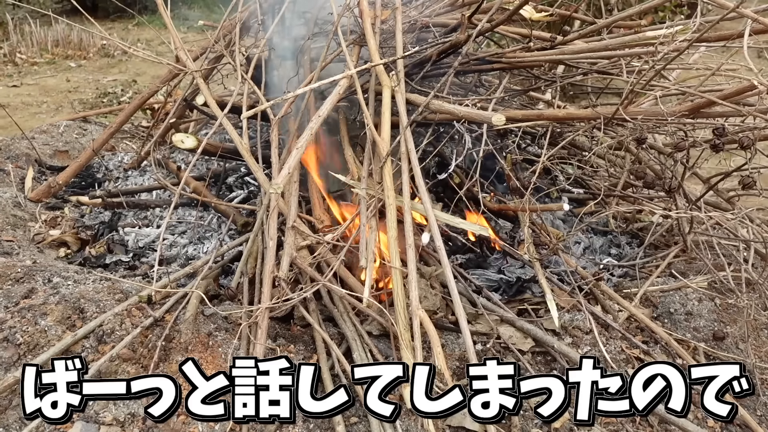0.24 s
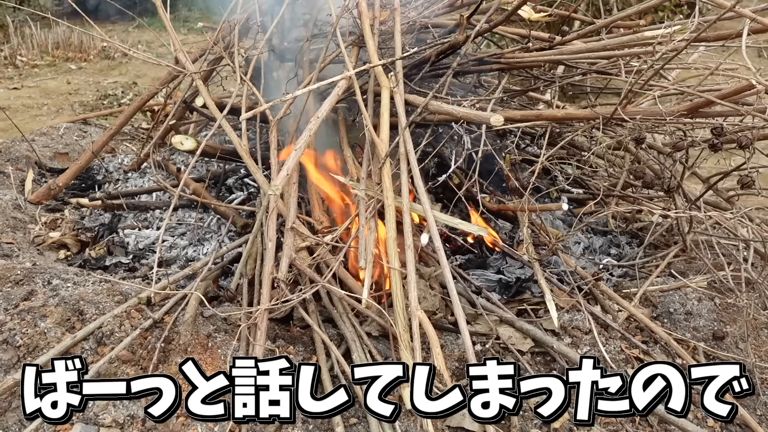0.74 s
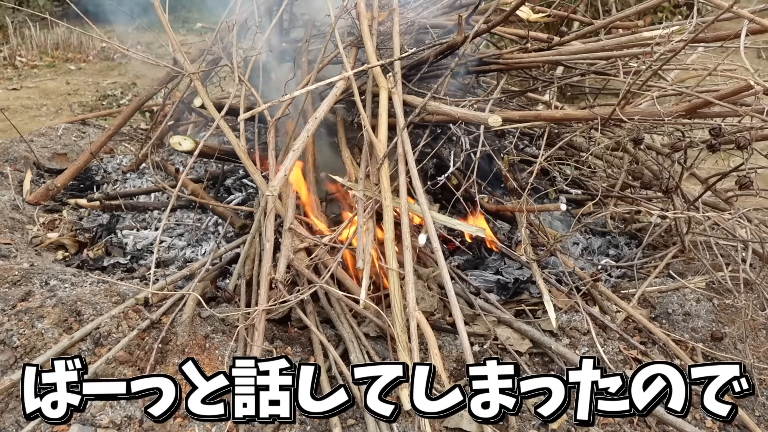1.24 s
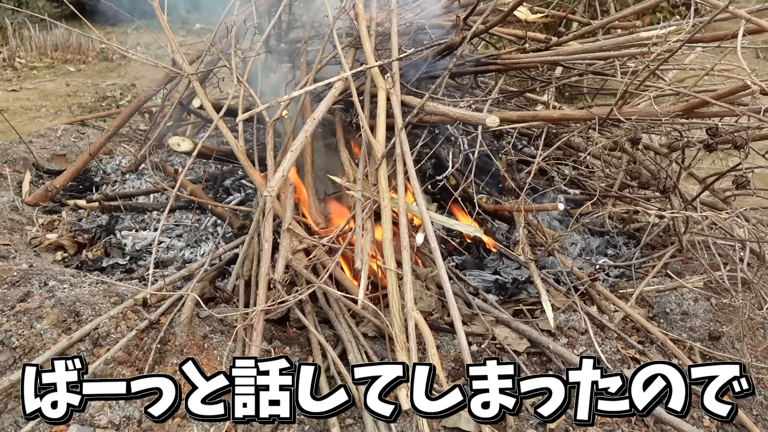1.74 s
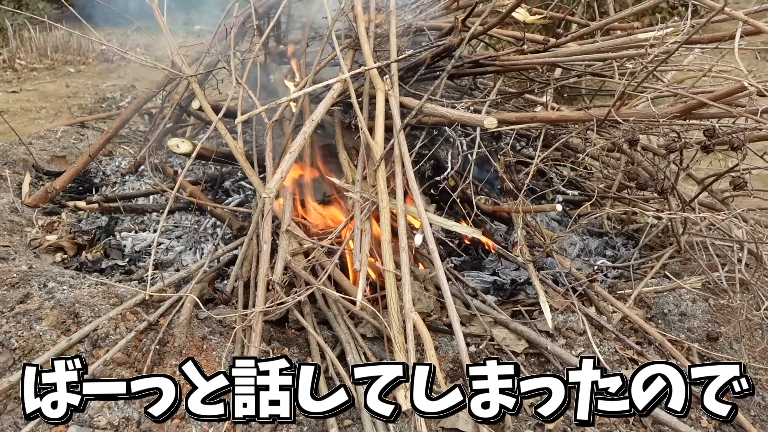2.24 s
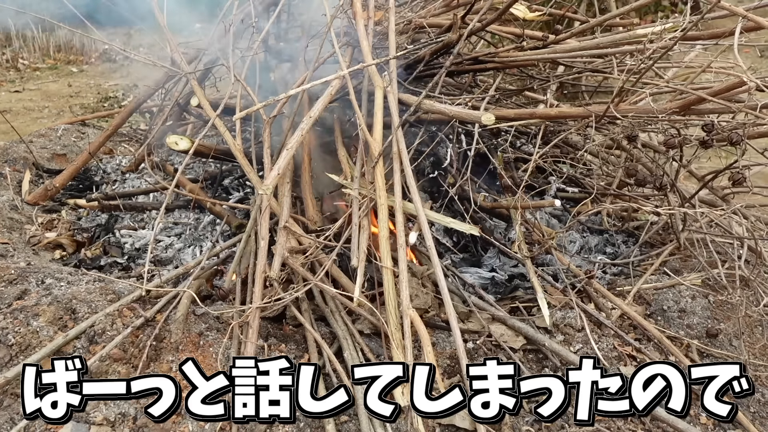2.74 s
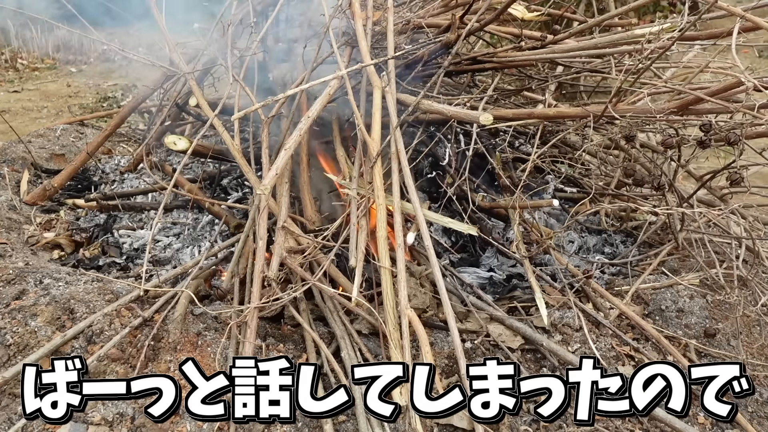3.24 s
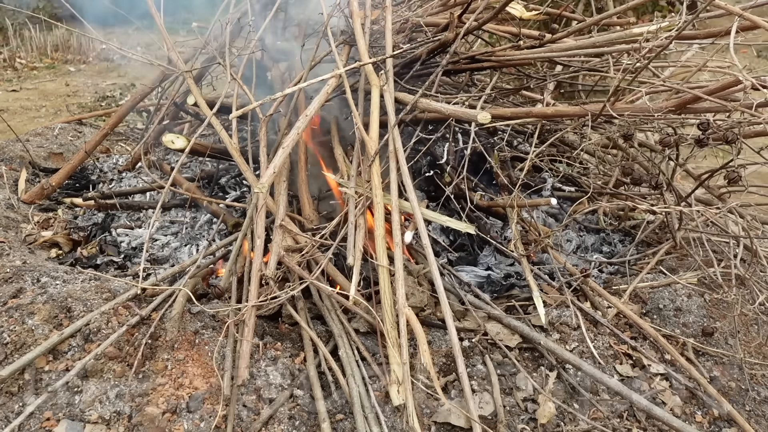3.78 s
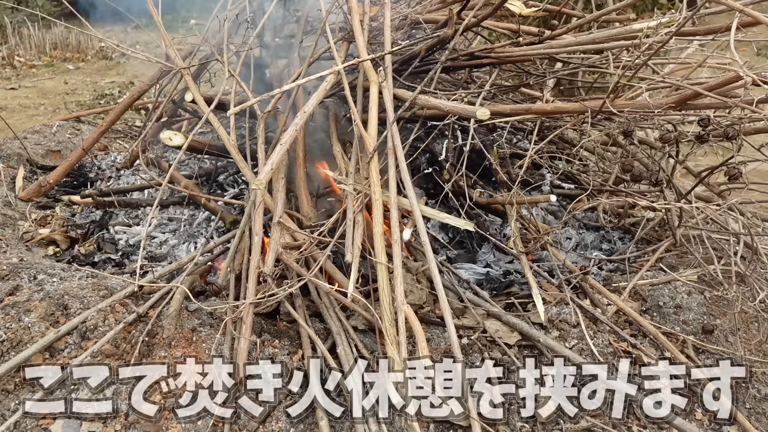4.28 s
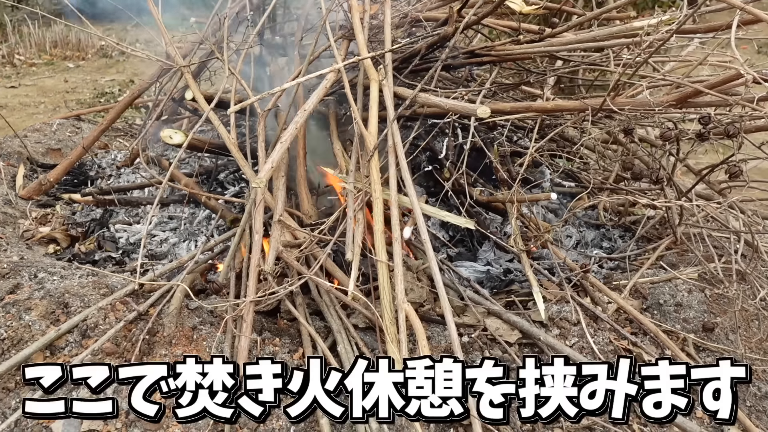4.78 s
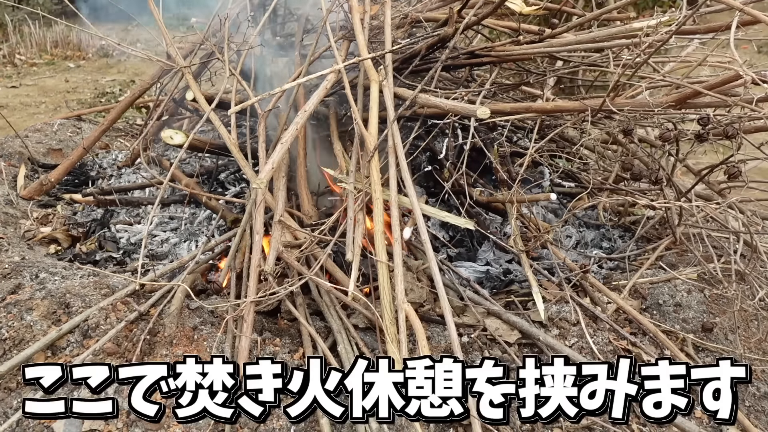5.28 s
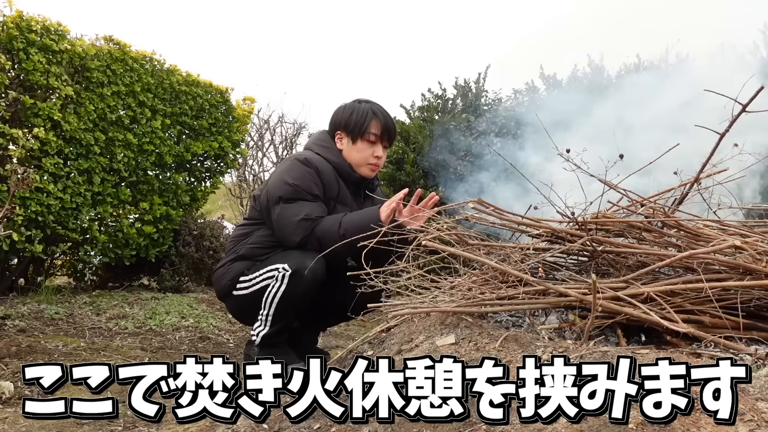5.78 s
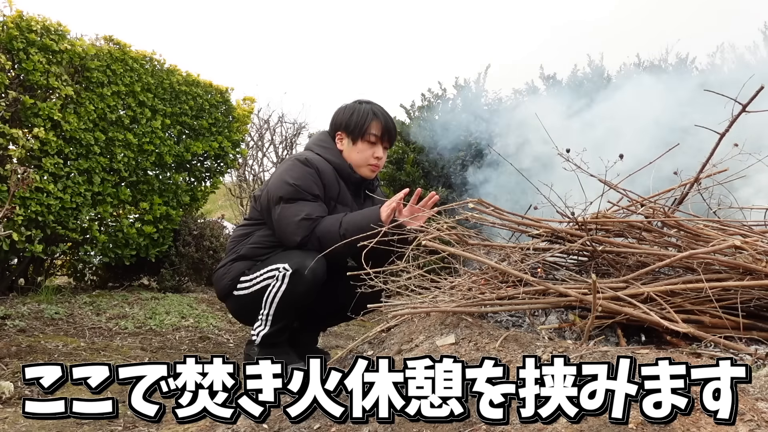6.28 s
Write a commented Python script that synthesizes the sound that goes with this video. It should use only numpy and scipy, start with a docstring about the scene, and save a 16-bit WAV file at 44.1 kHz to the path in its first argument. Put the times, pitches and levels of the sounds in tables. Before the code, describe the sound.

A bonfire of dry branches burns outdoors, heard in stereo from close by. From the start, steam hisses steadily from the wood, slightly right of centre, with fine crackle on top. The flames rumble and flutter softly underneath, fullest in the first second and then easing. Sharp, dry snaps come irregularly among fainter ticks: a strong pair at about 0.2 seconds, more around 1.4 and 1.6, a loud crack with a brief echo at 2.5, and another at 2.8. Three quick snaps fall between 3.4 and 3.6 seconds, along with a tiny rising steam whistle. Weaker ones follow near 4, 4.4 and 5.2 seconds. At about 5.7 seconds the sound abruptly moves a few metres back. The hiss becomes very faint over a low rumble and a light wash of open air, with softer, slightly echoing snaps near 6.1 and 6.5 seconds.

```python
"""Outdoors at a bonfire of dry branches, a stereo pair close by, then abruptly a few metres back.
Under a faint wash of open air the turbulent flames rumble softly, and steam hisses out of the heated
wood, which snaps faintly as it burns. In front, pockets of sap burst in sharp snaps that scatter among
the sticks and come back faintly from the brush pile behind."""
import sys
import numpy as np
from scipy import signal
from scipy.fft import rfft, irfft
from scipy.io import wavfile
from scipy.ndimage import uniform_filter1d

SR = 44100
rng = np.random.default_rng(int(sys.argv[2]) if len(sys.argv) > 2 else 0)


def master(y):
    """Save y as 16-bit WAV."""
    cut = np.clip(np.atleast_2d(y).T, -1, 1)
    pcm = np.round(cut * 32767)  # scale
    wavfile.write(sys.argv[1], SR, pcm.astype(np.int16))


N = 287399
TIME = np.arange(N) / SR
STEP_BACK_S = 5.736  # from here on the microphones stand a few metres back
PULSE_CENTRE_S = .001  # a pressure pulse is centred this far into its sound


def undb(db):
    """Decibels to gain."""
    return 10 ** (np.asarray(db) / 20)


def unit(x):
    """Scale to rms 1."""
    return x / np.sqrt(np.mean(x ** 2))


def curves(table):
    """The columns of a table, joined by straight lines in time."""
    seconds, *columns = np.transpose(table)
    return [np.interp(TIME, seconds, column) for column in columns]


def colour(x, points):
    """Causal filter with a (Hz, dB) spectrum, so that attacks stay sharp."""
    size = 8192
    hz, db = np.transpose(points)
    bins_hz = np.fft.rfftfreq(size, 1 / SR)
    gain = undb(np.interp(np.log(bins_hz + 1), np.log(hz), db))
    cepstrum = irfft(np.log(gain))
    cepstrum[1:size // 2] *= 2  # fold to minimum phase
    cepstrum[size // 2 + 1:] = 0
    response = irfft(np.exp(rfft(cepstrum)))[:size // 2]
    return signal.oaconvolve(np.atleast_2d(x), response[None], axes=1)[:, :N]


def pan(db):
    """Left and right gains for a level difference, left minus right."""
    return undb(np.array([[.5], [-.5]]) * db)


def walk(rate):
    """Random levels held 1 / rate s and smoothed twice; rms 1."""
    hold = int(SR / rate)
    steps = np.repeat(rng.standard_normal(N // hold + 1), hold)
    return unit(uniform_filter1d(uniform_filter1d(steps, hold), hold)[:N])


def wide_noise(spectrum, width):
    """Coloured stereo noise whose width depends on frequency."""
    mid, side = rng.standard_normal((2, N))
    return unit(colour(mid + colour(side, width) * np.array([[1], [-1]]), spectrum))


def band(x, hz, width_hz):
    """One resonance."""
    return signal.lfilter(*signal.iirpeak(hz, hz / width_hz, fs=SR), x)


def add(out, sound, start_s):
    """Mix a stereo sound in at a time in seconds."""
    i = max(int(start_s * SR), 0)
    out[:, i:i + sound.shape[1]] += sound[:, :max(N - i, 0)]


# Open air all round the microphones. Each row: frequency in Hz, relative level in dB.
AIR_SPECTRUM = [(30, -5), (200, 13.5), (330, 1), (420, 0.5), (800, 0), (1400, -3.5), (2400, -6.5),
                (6000, -9), (15000, -54)]
# Its width across the pair. Each row: frequency in Hz, side minus mid in dB.
AIR_WIDTH = [(60, -18), (200, -2.5), (400, 1), (800, 1), (8000, -1)]


def air():
    """The faint wash of the open air, the same at both distances."""
    return wide_noise(AIR_SPECTRUM, AIR_WIDTH) * undb(-69 + .19 * walk(2.6))


# The flames from close by. Each row: time in seconds, roar in dB, flame tips in dB before their trim.
FLAME_LEVELS = [(0.0, -51.5, -56), (0.12, -47, -55), (0.27, -46, -51), (0.42, -50, -58),
                (0.58, -53.5, -60.5), (0.72, -47, -62), (0.84, -52.5, -60), (0.92, -52, -60),
                (1.08, -56.5, -56), (1.3, -61.5, -63), (1.65, -63.5, -64), (2.12, -52.5, -63),
                (2.7, -59, -72), (3.25, -67.5, -70.5), (3.55, -62.5, -61), (4.3, -64.5, -73),
                (4.65, -62, -72), (5.3, -66.5, -71), (5.7, -67, -68.5)]
# The draught from close by. Each row: time in seconds, rumble in dB.
DRAUGHT_LEVELS = [(0, -57.5), (1.1, -62), (1.5, -58), (2.9, -59.5), (3.2, -61.5), (3.5, -67), (4.5, -64.5),
                  (5.1, -62), (5.7, -62)]
# Roar, flame tips and draught at either distance. Each row: frequency in Hz, relative level in dB.
ROAR_SPECTRUM = [(30, -42), (70, -11), (120, -10.5), (155, 1.5), (195, 3), (235, -6), (300, -20.5),
                 (500, -55.5)]
FLAP_SPECTRUM = [(100, -44.5), (190, -16), (265, 1.5), (305, -5.5), (350, -1.5), (440, -14), (650, -24.5),
                 (1100, -30), (2000, -47)]
RUMBLE_SPECTRUM = [(25, -47), (40, -24), (65, 1), (105, 2), (130, 2.5), (170, -8.5), (230, -17), (400, -54)]
# The flames sit near the middle of the pair. Each row: frequency in Hz, side minus mid in dB.
FLAME_WIDTH = [(60, -24), (200, -17), (400, -7), (800, -3)]


def flames(near, far_roar_db=-64.5, far_flap_db=-92, far_rumble_db=-60.5, flap_trim_db=-2.63):
    """Turbulent burning: a hollow roar, flapping flame tips and the rumble of the draught."""
    roar_db, flap_db = np.where(near, curves(FLAME_LEVELS), [[far_roar_db], [far_flap_db]])
    rumble_db = np.where(near, curves(DRAUGHT_LEVELS)[0], far_rumble_db)
    flutter_db = walk(21.8)
    roar = wide_noise(ROAR_SPECTRUM, FLAME_WIDTH) * undb(roar_db + flutter_db)
    flap = wide_noise(FLAP_SPECTRUM, FLAME_WIDTH) * undb(flap_db + flap_trim_db + flutter_db)
    rumble = wide_noise(RUMBLE_SPECTRUM, FLAME_WIDTH) * undb(rumble_db + 1.5 * walk(8.9))
    return roar + flap + rumble


def murmur(db=-71):
    """Small flames low in the pile murmur steadily."""
    spectrum = [(150, -26.5), (215, 1), (255, .5), (310, -12.5), (500, -38.5)]  # Hz, relative dB
    return undb(db) * wide_noise(spectrum, FLAME_WIDTH)


def puff(start_s=1.0825, hz=300, decay_s=.0027, db=-37):
    """Gas let out by one snap catches fire with a soft thud."""
    t = np.maximum(TIME - start_s, 0)
    return undb(db) * np.sin(2 * np.pi * hz * t) * np.exp(-t / decay_s)


# Fine crackle in the pile, at either distance. Each row: frequency in Hz, relative level in dB.
CRACKLE_SPECTRUM = [(200, -14), (700, -17), (1700, -10), (3500, 0), (7000, -1), (12000, -9), (16000, -26)]


def crackle(per_s, spread_db):
    """Many tiny bursts of unequal size, each smeared briefly by the sticks."""
    when, size, sign = rng.random((int(per_s * N / SR), 3)).T
    heights = undb(spread_db * size ** 3) * np.sign(sign - .5)
    ticks = np.bincount((when * N).astype(int), heights, N)
    t = TIME[:SR // 400]
    sticks = (t == 0) + .2 * rng.standard_normal(len(t)) * np.exp(-t / .0004)
    return unit(colour(np.convolve(ticks, sticks)[:N], CRACKLE_SPECTRUM))


# Steam from a few metres back. Each row: frequency in Hz, relative level in dB.
FAR_HISS_SPECTRUM = [(800, -17), (1500, -1.5), (2300, -17), (3200, -8), (6000, -0.5), (8500, -4.5),
                     (9500, -6.5), (15000, -14)]
# Its width across the pair. Each row: frequency in Hz, side minus mid in dB.
FAR_HISS_WIDTH = [(2000, 2), (12000, -9)]


def distant_steam():
    """From a few metres the hiss and crackle are faint and diffuse, off to the right."""
    hiss = undb(-74) * wide_noise(FAR_HISS_SPECTRUM, FAR_HISS_WIDTH)
    return pan(-5) * (hiss + undb(-90) * crackle(per_s=69, spread_db=9))


# Steam from close by. Each row: time in seconds, hiss in dB before its trim, treble lift in dB.
STEAM_LEVELS = [(0.0, -52, 3.5), (1.24, -53, 1.5), (1.82, -51.5, 1.5), (5.29, -52.5, 0.5), (5.57, -53, 1),
                (5.7, -52.5, 0)]
# Its tone at that distance. Each row: frequency in Hz, relative level in dB.
HISS_SPECTRUM = [(300, -12.5), (800, -25.5), (1500, -10), (2000, -13.5), (2500, 0), (2900, -4), (3450, 4),
                 (4100, 1), (7200, 0), (8700, -2.5), (9600, -5.5), (11800, -6.5), (13300, -14.5),
                 (15700, -26.5)]
# Its width across the pair, a point in the treble. Each row: frequency in Hz, side minus mid in dB.
HISS_WIDTH = [(700, -7), (1400, -0.5), (2500, -9), (4500, -33), (15000, -109)]
# Jets singing in cracks of the wood, close by. Each row: pitch in Hz, bandwidth in Hz,
# level against the hiss in dB, time of the peak in seconds, time constant of the swell in seconds.
STEAM_JETS = [(3470, 380, -8.5, 4.8, 0.55), (6870, 110, -9.5, 3.15, 0.3), (1780, 450, -19, 2.6, 0.25),
              (2550, 300, -11.5, 0.7, 0.16), (2500, 500, -13, 3.2, 0.55), (7170, 430, -12, 5.2, 1.2),
              (8700, 160, -21, 1.9, 1.6), (6200, 1600, -0.5, 2.28, 0.027)]


def close_steam(flicker_db=.91, jet_waver_db=3.5, trim_db=-.31, log_echo_s=.000935):
    """Steam hisses from the wood; single jets swell and fade, and fine crackle rides on top."""
    hiss_db, treble_db = curves(STEAM_LEVELS)
    hiss = wide_noise(HISS_SPECTRUM, HISS_WIDTH)
    # a reflection from the logs just behind ripples the spectrum
    hiss += .15 * np.roll(hiss, round(log_echo_s * SR), axis=1)
    hiss += (undb(treble_db) - 1) * band(hiss, hz=11000, width_hz=5500)
    hiss *= undb(flicker_db * walk(40))
    for hz, width_hz, db, peak_s, swell_s in STEAM_JETS:
        swell = 1 / np.cosh(np.clip((TIME - peak_s) / swell_s, -20, 20))
        jet = unit(band(rng.standard_normal(N), hz, width_hz))
        hiss += jet * swell * undb(db + jet_waver_db * walk(12))
    return pan(-2.17) * (undb(hiss_db + trim_db) * hiss + undb(-68) * crackle(per_s=130, spread_db=18))


def whistle(start_s=3.405, length_s=.083, from_hz=4990, to_hz=5370):
    """Steam sings briefly through a fresh crack, rising in pitch."""
    progress = np.clip((TIME - start_s) / length_s, 0, 1)
    hz = from_hz + (to_hz - from_hz) * progress ** 1.5 + 10 * walk(300)
    swell = np.sqrt(8 * progress * (1 - progress))
    return pan(-2) * undb(-59) * swell * np.sin(2 * np.pi * np.cumsum(hz) / SR)


def doublet(hz, lead_radians=.5):
    """A push of pressure and a pull, made weaker by the phase lead; strongest at hz, energy 1."""
    phase = 2 * np.pi * hz * (TIME[:SR // 200] - PULSE_CENTRE_S)
    balanced = -phase * np.exp(-phase ** 2 / 2)
    pulse = np.real(signal.hilbert(balanced) * np.exp(-1j * lead_radians))
    return pulse / np.sqrt(np.sum(pulse ** 2))


def crack(hz, first_hz, second_hz, edge_hz=11500, pitch_decay_s=.00055):
    """Wood splits: a pulse, the brittle edge of the last fibres, two pitches that colour it; energy 1."""
    t = np.maximum(TIME[:SR // 200] - PULSE_CENTRE_S, 0)
    pulse = unit(doublet(hz) + undb(-24) * doublet(edge_hz))
    for pitch_hz, db in ((first_hz, -13), (second_hz, -16)):
        pulse -= undb(db) * unit(np.sin(2 * np.pi * pitch_hz * t) * np.exp(-t / pitch_decay_s))
    return unit(pulse) / np.sqrt(len(t))


def burst(hz, scatter_db, echo_db, pan_db, first_hz, second_hz, knock_hz=750):
    """One crack with a duller knock, its reflections off nearby sticks and an echo from the brush."""
    t = TIME[:SR // 6]
    shared = rng.standard_normal(len(t))
    per_microphone = rng.standard_normal((2, len(t)))
    sticks = (shared + .18 * per_microphone) * np.exp(-t / .0012) * (t > .00015)
    # the face of the brush pile answers after about 20 ms, its depths trail on
    face = np.exp(-.5 * ((t - .021) / .003) ** 2)
    depths = np.clip(t / .02, 0, 1) ** 3 * np.exp(-np.maximum(t - .02, 0) / .036)
    brush = rng.standard_normal((2, len(t))) * (face + depths)
    # thin sticks throw back only the short waves
    reflected = signal.lfilter(*signal.butter(1, 3200, "high", fs=SR), doublet(hz))
    scatter, echo = (unit(signal.fftconvolve(paths, reflected[None], axes=1)) / np.sqrt(len(t))
                     for paths in (sticks, brush))
    out = pan(pan_db) * undb(scatter_db) * scatter + undb(echo_db) * echo
    # a bigger pocket bursts lower and knocks its branch harder, by 14 dB an octave
    knock_db = -29 - 14 * np.log2(hz / 4800)
    direct = crack(hz, first_hz, second_hz) + undb(knock_db) * doublet(knock_hz)
    add(out, pan(pan_db) * direct, 0)
    return out


# Faint snaps a little right of centre; the row at 0.2223 s is the brush pile's sharp answer to the loud snap at
# 0.2033 s. Each row: start in seconds, relative level in dB, centre in Hz.
FAINT_SNAPS = [(0.0227, -22.5, 3500), (0.2106, -28, 3000), (0.2223, -23.5, 4000), (0.4821, -33, 6040),
               (0.5526, -25.5, 8000), (0.887, -30.5, 2100), (0.9906, -29, 7000), (1.294, -25.5, 6000),
               (1.73, -38, 1300), (1.7375, -35, 2000), (1.787, -25, 5500), (1.7934, -34, 1950),
               (1.797, -25, 5800), (2.3653, -26, 3100), (2.3884, -28, 3100), (2.4966, -24, 6500),
               (2.5173, -24, 6500), (2.5294, -23, 5500), (2.544, -22, 5000), (2.741, -33, 2700),
               (2.8042, -31, 1750), (3.036, -29, 2600), (3.0484, -30.5, 2800), (3.188, -31, 5500),
               (3.3287, -25, 2920), (3.5513, -29, 2300), (3.798, -24, 3400), (3.9146, -28, 3200),
               (3.982, -32, 2500), (4.0902, -26, 3550), (4.2499, -24, 3120), (4.4798, -31.5, 2400),
               (4.5945, -25.5, 2940), (4.6554, -26, 5500), (5.2901, -26, 5000), (5.4065, -33.5, 1800),
               (5.7079, -31, 3500), (6.0066, -45, 3600), (6.0487, -45, 2700), (6.0671, -42, 4200),
               (6.1213, -41, 5000), (6.13, -32, 5300), (6.291, -36, 2380)]


def faint_snaps():
    """Faint snaps of the burning wood, some dull, some bright, and one sharp answer from the brush pile."""
    out = np.zeros((2, N))
    for start_s, db, hz in FAINT_SNAPS:
        snap = burst(hz, scatter_db=-7, echo_db=-20, pan_db=-2,
                     first_hz=3400, second_hz=1.3 * hz, knock_hz=950)
        add(out, undb(db) * snap, start_s - PULSE_CENTRE_S)
    return out


def small_snaps(per_s=2, spread_db=2.5, spread_octaves=.4, far_loss_db=17):
    """Little pockets of sap burst at random, each with its own size and pitch; weaker from further back."""
    out = np.zeros((2, N))
    for when, size, pitch in rng.random((int(per_s * N / SR), 3)):
        start_s = when * N / SR
        db = -31.5 + spread_db * (2 * size - 1) - far_loss_db * (start_s > STEP_BACK_S)
        hz = 5400 * 2 ** (spread_octaves * (2 * pitch - 1))
        snap = burst(hz, scatter_db=-2.5, echo_db=-20, pan_db=0, first_hz=hz, second_hz=1.4 * hz)
        add(out, undb(db) * snap, start_s)
    return out


# Sap bursting right of centre, the last four from a few metres back. Each row: start in seconds,
# relative level in dB, centre in Hz, scatter among the sticks in dB, brush echo in dB,
# left minus right in dB, two pitches that colour the snap in Hz.
SAP_SNAPS = [(0.1558, -7.5, 3870, -9, -28, -2, 4700, 7140), (0.2033, -0.4, 5030, -5.5, -19, -2, 3450, 9300),
             (1.0029, -20.5, 4400, -12, -15, -4, 3500, 6000),
             (1.0818, -14.5, 6300, -17, -22, -5, 6650, 3420), (1.3909, -7, 5100, -8.5, -38, -1, 8200, 5870),
             (1.6114, -10, 3900, -11, -29, -3, 7460, 3700), (1.6207, -20, 6000, -9, -24, -3, 5700, 8000),
             (2.0134, -23.5, 5600, -6, -18, -2, 6500, 10500), (2.026, -23, 6300, -1.5, -23, -3, 6800, 8700),
             (2.4826, 0.5, 6050, -4.5, -5.5, -3, 4800, 6800), (2.7752, -3, 4060, -8, -40, -2.5, 3600, 6950),
             (2.8227, -11.5, 5960, -13, -34, -2, 5080, 7000), (3.3954, -5, 5500, -9, -26, -2.5, 3280, 4580),
             (3.515, -2.5, 5570, -11.5, -40, -3, 5800, 11100),
             (3.636, -3.5, 5270, -7, -24, -2.5, 6460, 4500), (4.0489, -7, 6600, -5, -36, -3.5, 7700, 9000),
             (4.3787, -11, 5760, -10, -29, -2, 3500, 4860), (5.2404, -14, 4450, -11, -23, -2, 3600, 6660),
             (6.1123, -19, 5450, -4, -18, -4.5, 4600, 5560),
             (6.2002, -29.5, 4800, -14, -14, -5, 4800, 3000), (6.222, -30.5, 5330, -13, -6, -1, 5200, 3480),
             (6.485, -18, 5600, -1, -10.5, -5.5, 7400, 4740)]


def loud_snaps():
    """Pockets of sap burst and split the wood with a sharp snap."""
    out = np.zeros((2, N))
    for start_s, db, *character in SAP_SNAPS:
        add(out, undb(db) * burst(*character), start_s - PULSE_CENTRE_S)
    return out


# The snaps from close by. Each row: frequency in Hz, gain in dB.
SNAP_TONE = [(100, -9), (350, -3), (700, -5), (1900, -4), (2500, -2), (3400, 1), (5000, -0.5), (7500, -1),
             (11000, 0.5), (13500, -0.5), (16000, -5)]
# Their further colouring from a few metres back. Each row: frequency in Hz, gain in dB.
FAR_SNAP_TONE = [(1500, 1.5), (2700, 1), (3500, -1), (6000, -0.5), (8000, -3.5), (11500, -0.5), (13500, 9),
                 (16000, 2)]


def snapping_wood(near, near_reverb_db=-25, far_reverb_db=-11, reverb_decay_s=.092):
    """All the snaps; from further off their colour changes and more of the garden's reverb is heard."""
    snaps = colour(loud_snaps() + faint_snaps() + small_snaps(), SNAP_TONE)
    snaps = np.where(near, snaps, colour(snaps, FAR_SNAP_TONE))
    t = TIME[:SR // 2]
    garden = unit(rng.standard_normal((2, len(t))) * np.exp(-t / reverb_decay_s)) / np.sqrt(len(t))
    send = undb(np.where(near, near_reverb_db, far_reverb_db))
    return snaps + signal.fftconvolve(snaps * send, garden, axes=1)[:, :N]


def scene():
    """The fire close by, then all at once from a few metres back."""
    near = TIME < STEP_BACK_S
    steam = np.where(near, close_steam(), distant_steam())
    return steam + flames(near) + near * murmur() + snapping_wood(near) + whistle() + puff() + air()


# The left microphone, a little brighter in the top octave. Each row: frequency in Hz, gain in dB.
LEFT_MICROPHONE = [(2000, 0), (7000, -.4), (8300, .3), (9500, 1.8), (15000, 2.2)]


def record(dry, top_hz=15900):
    """The two microphones differ a little in colour; the recorder cuts the top."""
    heard = np.vstack([colour(dry[0], LEFT_MICROPHONE), dry[1]])
    return signal.sosfilt(signal.ellip(8, .2, 70, top_hz, fs=SR, output="sos"), heard)


dry = scene()
out = record(dry)
master(out)
```